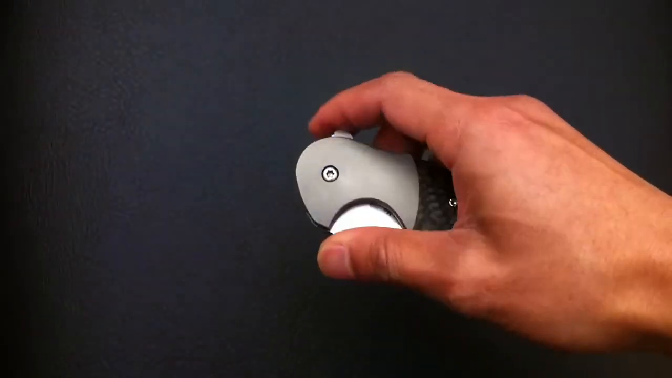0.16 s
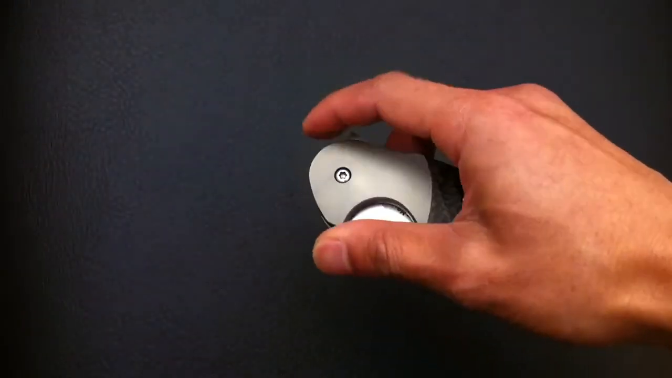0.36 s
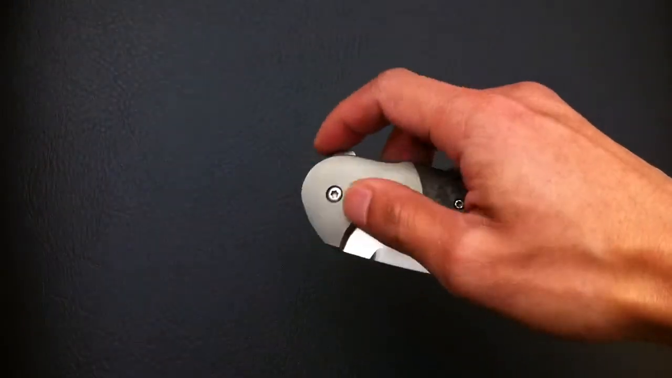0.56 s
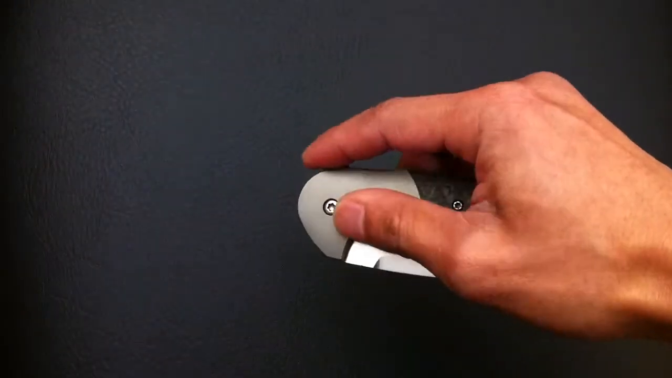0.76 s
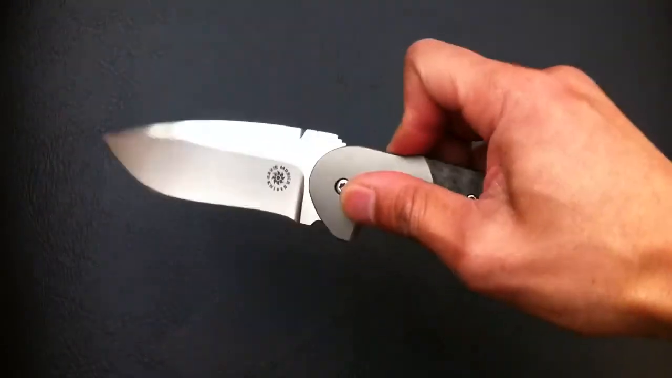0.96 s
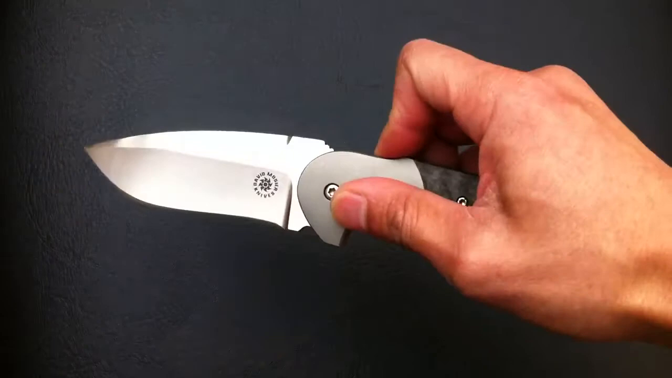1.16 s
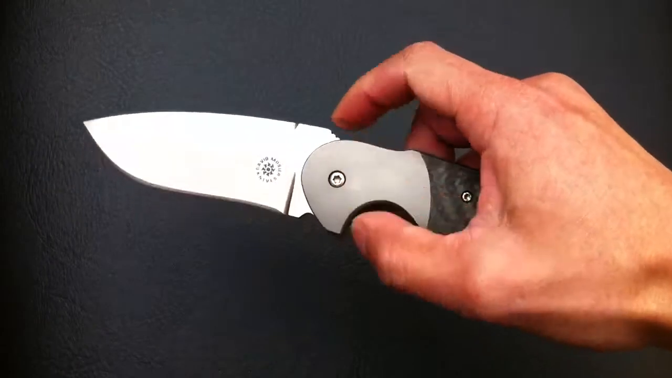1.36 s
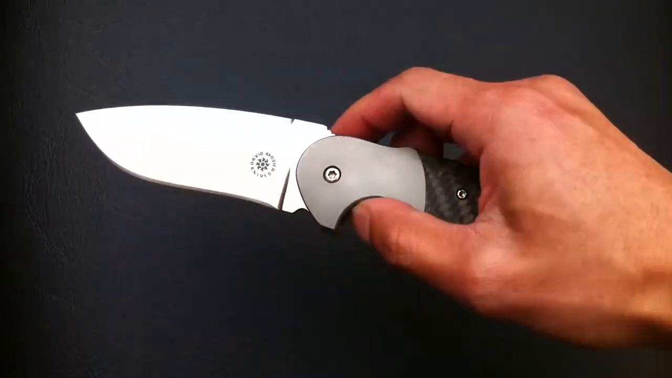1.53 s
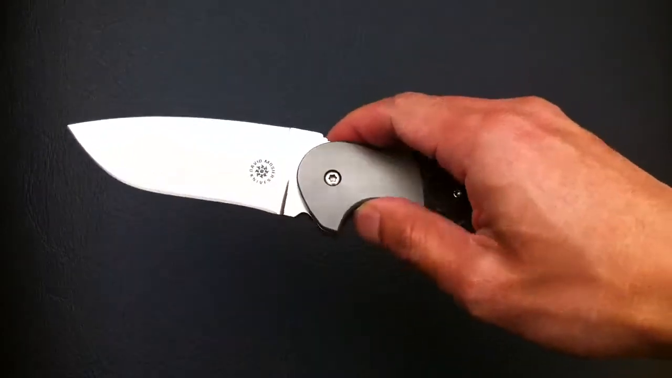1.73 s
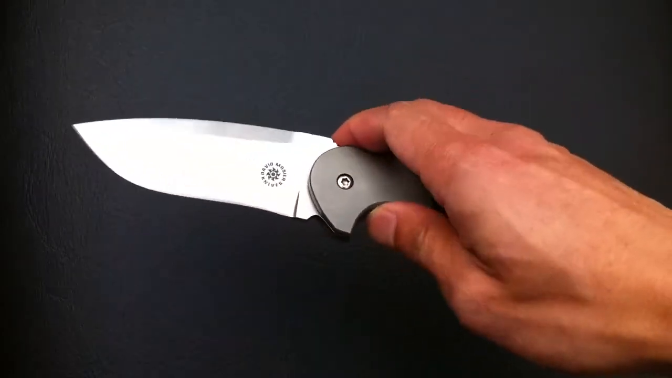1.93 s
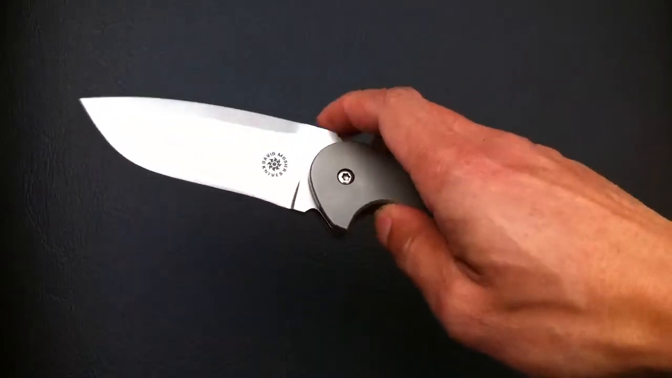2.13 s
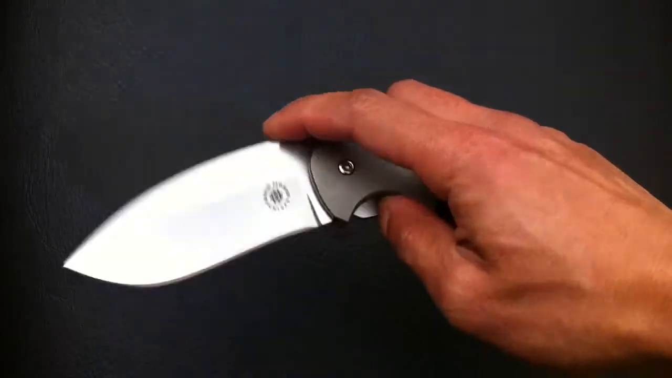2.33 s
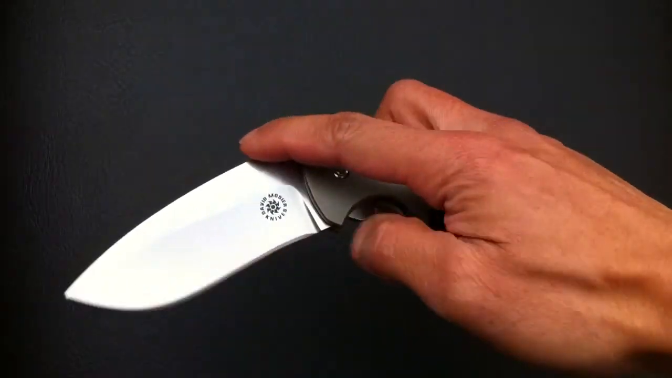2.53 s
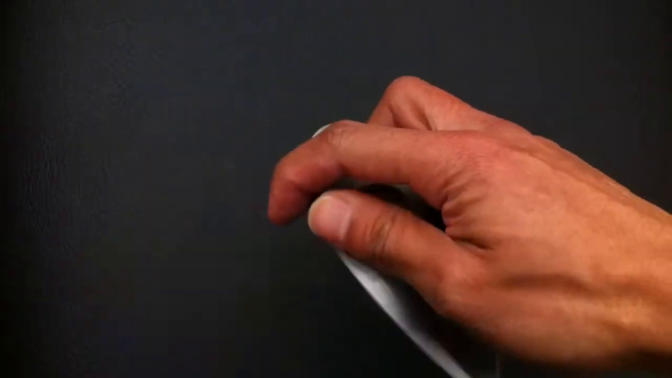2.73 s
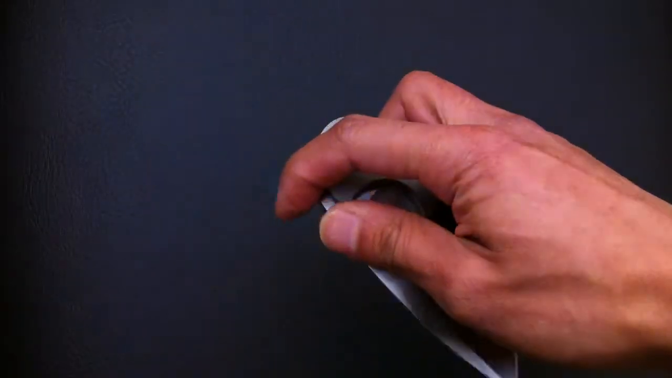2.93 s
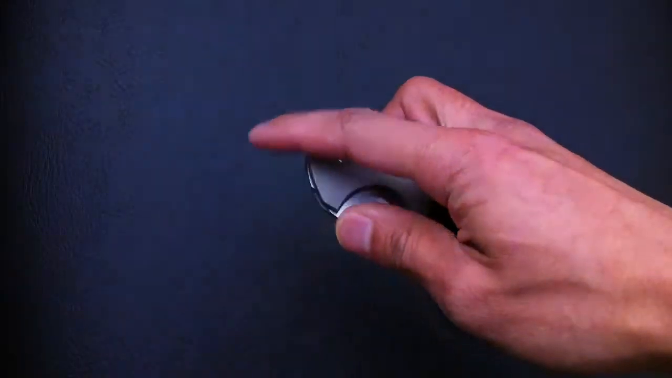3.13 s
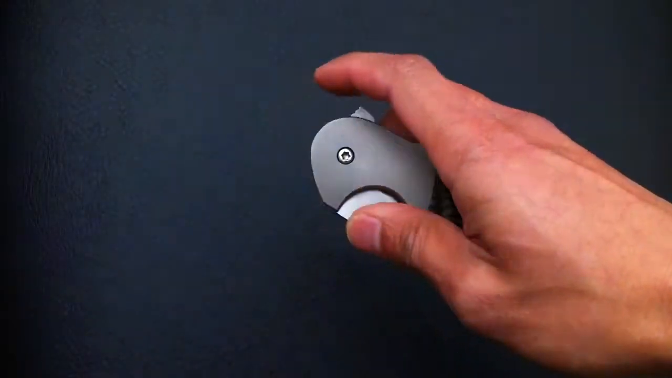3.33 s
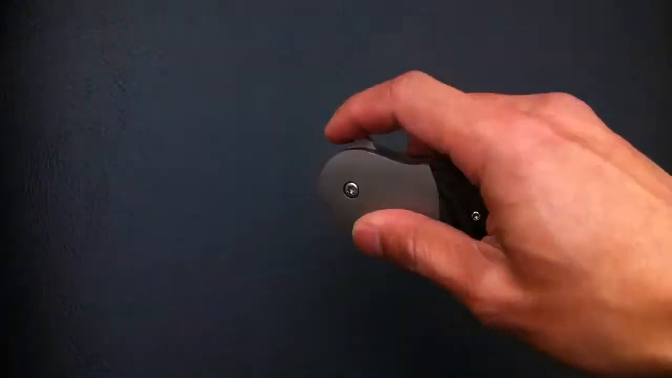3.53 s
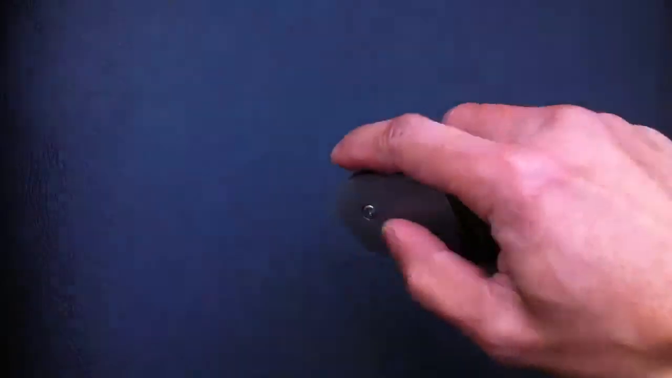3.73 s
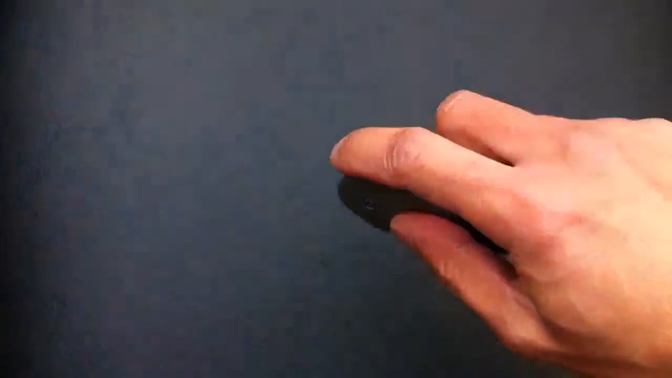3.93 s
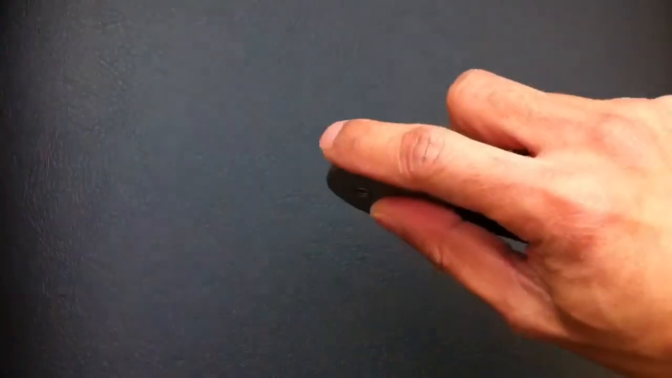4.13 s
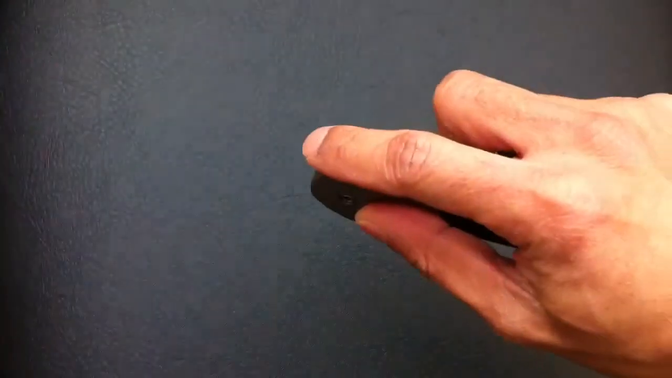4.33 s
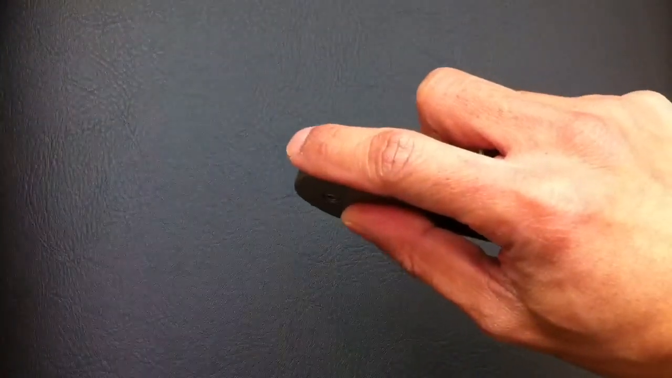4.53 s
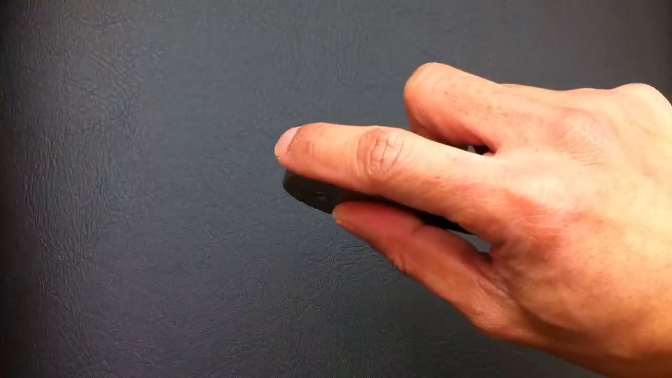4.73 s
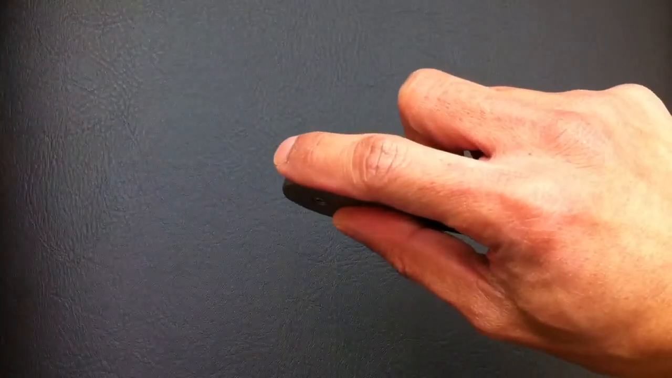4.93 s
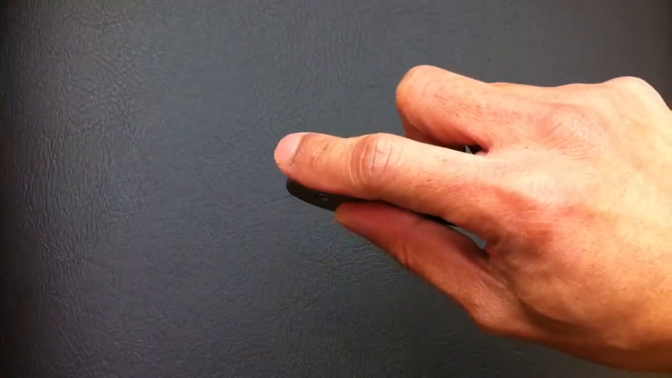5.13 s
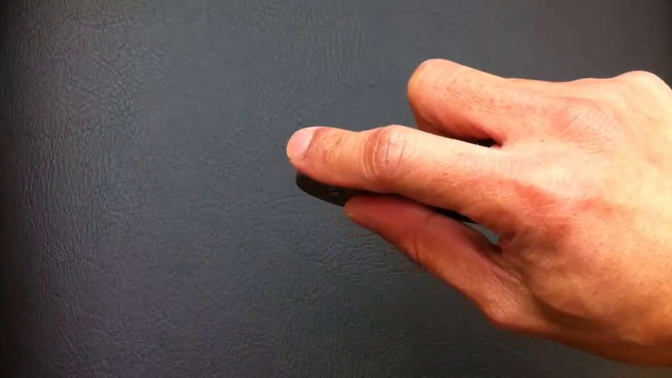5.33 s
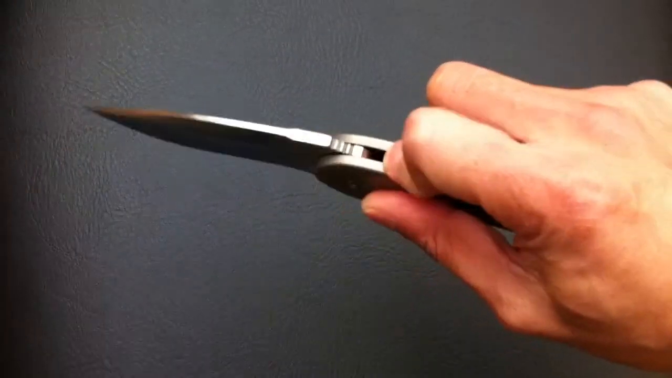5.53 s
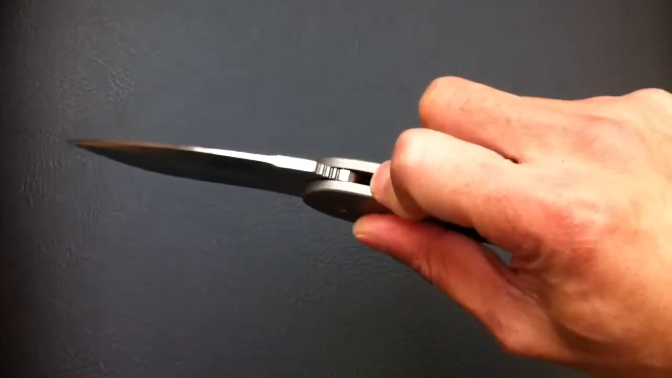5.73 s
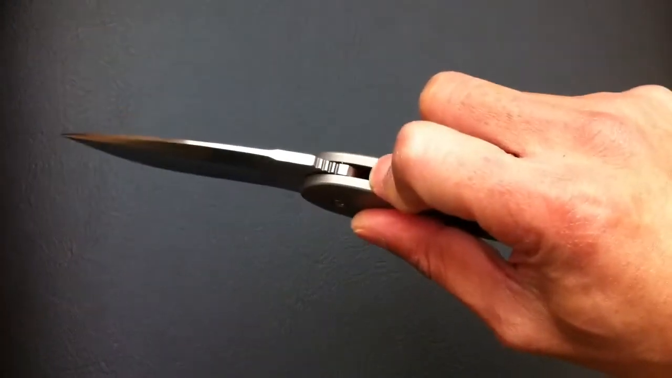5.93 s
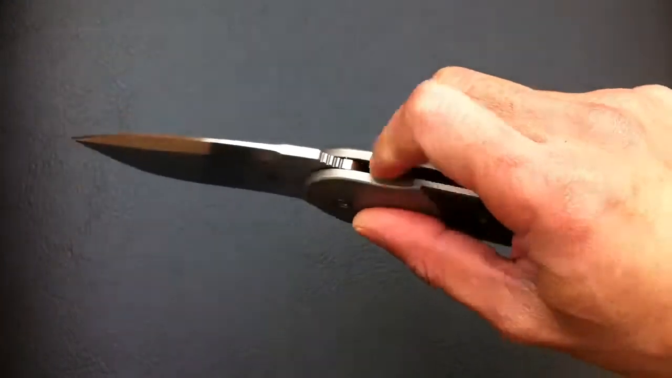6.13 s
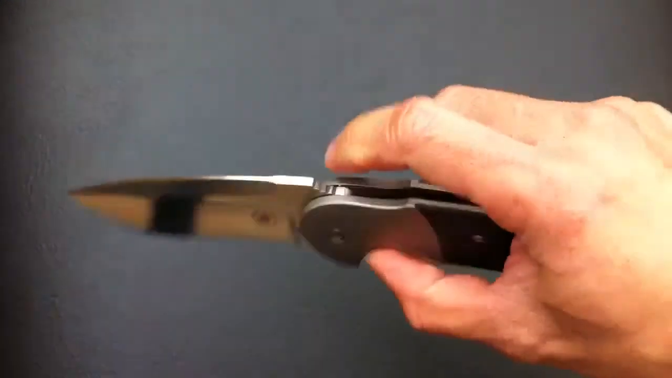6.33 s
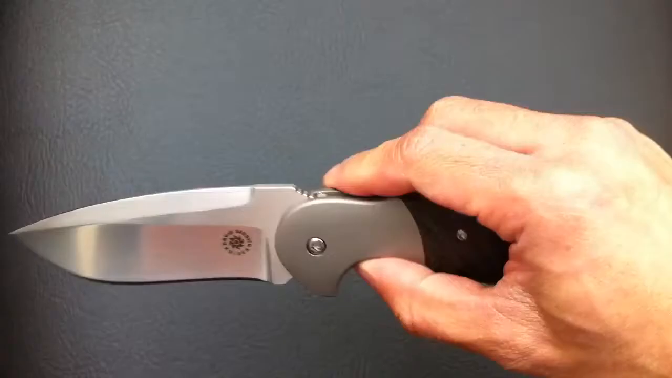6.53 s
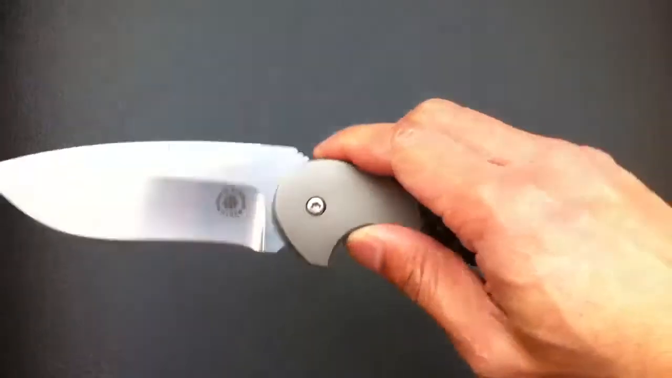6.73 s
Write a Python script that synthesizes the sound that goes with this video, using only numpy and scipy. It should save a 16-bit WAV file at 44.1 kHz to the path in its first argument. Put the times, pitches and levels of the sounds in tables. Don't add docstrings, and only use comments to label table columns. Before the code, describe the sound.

Close up in a quiet room, a folding knife flicks open with a brief swish and a loud, bright steel snap. Faint skin rubbing follows, then a modest click and dull knock as it is folded. Soft low bumps and a run of tiny nail ticks lead to a second hard snap. A small microphone picks up faint room air and distant hum.

```python
import sys
import numpy as np
from scipy import signal
from scipy.fft import rfft, irfft
from scipy.io import wavfile

SR = 44100
rng = np.random.default_rng(int(sys.argv[2]) if len(sys.argv) > 2 else 0)


def persist_wave(psi):
    counts = np.round(np.clip(psi, -1, 1) * 32767).astype(np.int16)
    wavfile.write(sys.argv[1], SR, np.atleast_2d(counts).T)


def volts(x):
    e = np.asarray(x, float) / 20
    return 10 ** e


N = 299439
TIME = np.arange(N) / SR

# start in seconds, peak in dB, level of the lows in dB, strongest frequency in Hz.
CONTACTS = [(0.053, -31, -18, 3700), (0.0536, -24.5, -17, 6670), (0.056, -27, -24, 5000),
            (1.0024, -40, -22, 5620), (1.0053, -34.5, -16, 5510), (1.0642, -16, -26, 6500),
            (1.0654, -13.5, -24.5, 6800), (1.0673, -21.5, -23, 6870), (1.0719, -6, -10, 6930),
            (1.0732, -1, -16, 6160), (1.0755, -13.5, -23, 6000), (1.0815, -24, -11.5, 6160),
            (2.4716, -42, -2.5, 5900), (2.592, -51, -3.5, 5370), (3.3153, -41, 2, 5060),
            (3.318, -25.5, -17, 7000), (3.3199, -29.5, -22, 6870), (5.5979, -35, 1.5, 5500),
            (5.652, -19.5, -27.5, 5100), (5.6531, -18.5, -28.5, 5040), (5.657, -26, -5.5, 6370),
            (5.659, -5.5, -11, 5180), (5.6599, -6, -7.5, 3300), (5.661, -0.5, -11, 6070),
            (5.6621, -3, -11.5, 7070), (5.6628, -18, -6, 6550), (5.6655, -18, -6.5, 3300)]
# start in seconds, peak in dB, level of the lows in dB, strongest frequency in Hz.
TICKS = [(2.49, -52, -12.5, 6460), (3.985, -56, 2, 6370), (4.4069, -36.5, -11, 7300),
         (4.5252, -45.5, -14, 7360), (4.862, -43, 3.5, 5570), (4.8681, -30, -13, 7330),
         (4.896, -34, -13, 7350), (4.9332, -33, -16, 7000), (4.9628, -34, -17, 7400),
         (4.9966, -36.5, -16, 7300), (5.0233, -41, -18, 7300)]
# time in seconds, level in dB.
SWAY = [(0, -54.5), (.43, -60.5), (.74, -43), (1.0, -59), (2.3, -60.5), (2.9, -53.5), (3.25, -59.5),
        (3.48, -42), (3.69, -47.5), (3.9, -44.5), (4.25, -58.5), (5.5, -60), (6.79, -55.5)]


def rms_one(x):
    return x / np.sqrt(np.mean(x ** 2) + 1e-30)


def band(x, low_hz, high_hz):
    sos = signal.butter(2, [low_hz, min(high_hz, 0.45 * SR)], "band", fs=SR, output="sos")
    return signal.sosfilt(sos, x)


def ring(x, hz, width_hz):
    radius, turn = np.exp(-np.pi * width_hz / SR), 2 * np.pi * hz / SR
    return signal.lfilter([0, np.sin(turn)], [1, -2 * radius * np.cos(turn), radius ** 2], x + 1e-18)


def drift(rate):
    steps = rng.standard_normal(int(N / SR * 40) + 2)
    return rms_one(np.interp(TIME * min(rate, 39), np.arange(len(steps)), steps))


def strikes(events, modes, scatter_db, widen, focus_db, highs_db):
    out, time = np.zeros(N + 2048), np.arange(1920) / SR
    log_hz = np.log(np.arange(1025) * SR / 2048 + 1)
    for s, peak_db, lows_db, strongest_hz in events:
        struck = list(modes) + [(strongest_hz, 330, focus_db)]
        hz, width_hz, level_db = np.transpose(struck)[:, :, None]
        strength = volts(level_db + scatter_db * rng.standard_normal(hz.shape))
        strength = strength * np.sign(rng.standard_normal(hz.shape))
        ringing = np.sin(2 * np.pi * hz * time) * np.exp(-np.pi * widen * width_hz * time)
        sound = np.sum(strength * ringing, axis=0)
        sound[:200] += volts(-0.5) * rng.standard_normal(200) * np.exp(-time[:200] / 0.00055)
        sound *= 1 - np.exp(-time / 0.0004)

        thud_db = -24.5 - 0.4 * peak_db
        bright_db = highs_db + 0.15 * peak_db
        tilt_hz = [130, 400, 1000, 2700, 4100, 5200, 11000, 16000]
        tilt_db = [thud_db - 34, thud_db + 6, thud_db + 19, lows_db + 13.5,
                   0.5 * lows_db - 2, 0, bright_db + 8, bright_db - 3.5]
        tilt = volts(np.interp(log_hz, np.log(tilt_hz), tilt_db))
        sound = irfft(rfft(np.pad(sound, 64)) * tilt)
        at = round(s * SR) - 64
        out[at:at + 2048] += volts(peak_db) * sound / np.abs(sound).max()
    return out[:N]


def steel():
    # frequency in Hz, width in Hz, level in dB.
    knife = [(600, 400, -18.5), (950, 400, -11.5), (1900, 680, -10.5), (2500, 270, -11), (3335, 170, -11),
             (4700, 250, -10.5), (5340, 270, -6.5), (6200, 300, -6), (6760, 320, -0.5), (7830, 180, -10),
             (9030, 210, -10.5), (10900, 350, -9), (12320, 400, -7), (13900, 300, -12.5)]
    return strikes(CONTACTS, knife, scatter_db=2.5, widen=1.3, focus_db=7.5, highs_db=-6)


def nail_ticks():
    # frequency in Hz, width in Hz, level in dB.
    ridges = [(3360, 410, -8), (5770, 480, -7), (7350, 280, -6), (9330, 210, -11.5), (11000, 1100, -5.5),
              (13500, 700, -16.5)]
    return strikes(TICKS, ridges, scatter_db=3.5, widen=1.03, focus_db=1.0, highs_db=-1)


def room():
    # band centre in Hz, width in Hz, level in dB, 60 dB decay time in seconds.
    tail = [(1400, 700, -17.5, 0.11), (2550, 900, -10, 0.19), (3300, 600, -6, 0.15), (4820, 1300, -4, 0.17),
            (6080, 1100, 2, 0.19), (5900, 540, -10, 0.26), (6630, 2000, -7, 0.23), (9140, 2300, -6, 0.2),
            (12100, 3000, -11, 0.13)]
    time, energy, out = np.arange(SR // 2) / SR, np.zeros(N), 0
    s, peak_db = np.transpose(CONTACTS + TICKS)[:2]
    energy[(s * SR).astype(int)] = volts(2.75 * peak_db + 2)
    build_up = np.clip((time - 0.001) / 0.005, 0, 1)
    for hz, width_hz, level_db, t60 in tail:
        decay = (build_up * volts(level_db - 32 - 60 * time / t60)) ** 2
        envelope = np.sqrt(np.abs(signal.fftconvolve(energy, decay)[:N]))
        noise = band(rng.standard_normal(N), hz - width_hz / 2, hz + width_hz / 2)
        out = out + envelope * rms_one(noise) * volts(3.5 * drift(39))
    return out


def strokes():
    # peak time in seconds, peak in dB, length in seconds,
    # brightness in dB, hump frequency in Hz.
    rubs = [(.14, -75, .1, 15, 6300), (.24, -73, .3, -4, 6255), (.38, -57.5, .05, -6, 5590),
            (.42, -67, .2, -5, 5900), (.74, -70, .2, -6, 6120), (0.841, -70, .3, -7, 6200),
            (1.42, -71, .16, -10, 6300), (1.572, -70.5, .06, -16.5, 6030), (1.635, -71, .2, -6, 6202),
            (1.79, -70, .06, -16, 5990), (1.95, -75.5, .7, -8, 6130), (2.474, -65, .05, -7, 5770),
            (2.605, -65, .08, -6, 5900), (2.816, -71, .3, -3, 6370), (3.565, -60, .17, -13, 5810),
            (3.656, -62.5, .22, -8.5, 5890), (3.878, -66.5, .15, -10, 5870), (3.98, -67.5, .06, 5, 5960),
            (4.087, -66.5, .2, -4.5, 6490), (4.435, -63, .1, -1.5, 6940), (5.385, -63.5, .18, -8.5, 6190),
            (6.435, -63, .13, -9, 6440), (6.613, -68.5, .22, -5, 6380), (6.726, -65.5, .12, -11, 6480)]
    # start in seconds, stop in seconds, level in dB, hump in Hz.
    swings = [
        (1.008, 1.049, -57, 5686),
        (5.602, 5.64, -56, 6100),
    ]
    rise_share = 0.41
    time = TIME[::32]
    body = volts(-88) + 0 * time
    skin, pull = body * volts(-2.5), body * 6100
    for s, peak_db, length, bright_db, hz in rubs:
        away = np.maximum((s - time) / (rise_share * length), (time - s) / ((1 - rise_share) * length))
        level = volts(peak_db - 24.5 * away ** 1.4)
        body, skin, pull = body + level, skin + level * volts(bright_db), pull + level * hz
    for start, stop, peak_db, hz in swings:
        fade = np.clip(np.minimum(time - start, stop - time) / 0.0045, 0, 1)
        arch = np.clip(2 * (time - start) / (stop - start) - 1, -1, 1) ** 2
        level = fade * volts(peak_db - 8.5 * arch)
        body, skin, pull = body + level, skin + level * volts(-5), pull + level * hz
    return [np.interp(TIME, time, curve) for curve in (body, skin, pull / body)]


def rubbing():
    body, skin, centre_hz = strokes()
    grains = rng.standard_normal((3, N)) * volts(3.5 * np.minimum(rng.exponential(1, (3, N)), 5))

    slow = band(grains[:2], 12, 480)
    turn = 2 * np.pi * np.cumsum(centre_hz) / SR
    hump = rms_one(slow[0] * np.cos(turn) + slow[1] * np.sin(turn))
    hump = hump + volts(-5) * rms_one(band(grains[0], 2900, 8500))

    sheen = rms_one(ring(grains[2], 9500, 980) - ring(grains[2], 10900, 800))
    sheen = sheen + volts(-1.0) * rms_one(band(grains[2], 7500, 11800))

    body = body * volts(2 * drift(35))
    skin = skin * volts(2 * drift(25) - 1.0)
    return body * rms_one(hump) + skin * rms_one(sheen)


def tremors():
    count = 32
    when = rng.random(count) * N / SR
    size, pitch, span = rng.standard_normal((3, count))
    peak_db, hz, length_ms = -48 + 2 * size, 240 * np.exp(0.15 * pitch), 7.3 * np.exp(0.33 * span)
    return np.transpose([when, peak_db, hz, length_ms]).tolist()


def bumps():
    # time in seconds, peak in dB, frequency in Hz, length in milliseconds.
    clear_bumps = [(.0187, -40, 263, 4.7), (.6436, -44.5, 160, 19), (0.6673, -35.5, 184, 8.4),
                   (0.6819, -38, 238, 6.6), (0.6933, -33.5, 207, 6.3), (0.7006, -31, 242, 3.4),
                   (.7436, -39.5, 190, 4.9), (1.321, -46.5, 242.4, 5), (1.358, -39.5, 149, 10),
                   (1.7837, -39, 193, 4.6), (1.905, -47, 574, 19), (1.9747, -40.5, 346, 4.3),
                   (2.5338, -45, 240, 5.2), (3.3191, -39, 212, 5.9), (3.331, -30.5, 222, 3.2),
                   (3.34, -33.5, 175, 3.9), (3.3557, -25, 192, 7.1), (3.494, -34.5, 200, 3.2),
                   (3.505, -29.5, 181, 8), (3.517, -36.5, 206, 7.8), (3.5271, -36.5, 204, 6.7),
                   (3.5809, -34, 190, 6.7), (3.674, -38.5, 158, 5), (3.737, -42, 184, 7.9),
                   (3.7526, -36.5, 190, 6.8), (3.816, -37, 162, 7), (3.837, -40, 151, 18),
                   (4.171, -44.5, 200, 4.3), (4.4124, -42, 318, 4.6), (5.495, -42.5, 254, 6)]
    out = np.zeros(N)
    for s, peak_db, hz, length_ms in clear_bumps + tremors():
        near = slice(max(round((s - 0.1) * SR), 0), round((s + 0.1) * SR))
        away = TIME[near] - s
        swell = np.exp(-0.5 * (away / (0.00044 * length_ms)) ** 2)
        turn = 2 * np.pi * (hz * away + rng.random())
        swing = swell * np.cos(turn) + 0.2 * swell ** 2 * np.cos(2 * turn)
        out[near] += volts(peak_db + 2) * swing
    rumble = rms_one(band(band(rng.standard_normal(N), 86, 210), 82, 290))
    rumble_db = np.interp(TIME, *np.transpose(SWAY)) - 9 + 2.8 * drift(25)
    return out + rumble * volts(rumble_db)


def air():
    # frequency in Hz, level in dB per Hz.
    colour = [(40, -46.5), (90, -24.5), (140, -5), (270, -3.5), (330, -6.5), (600, -10), (950, -8),
              (1450, -15.5), (2100, -24.5), (3000, -32), (4300, -34), (6300, -33.5), (8500, -37),
              (16000, -39.5)]
    # time in seconds, level in dB.
    traffic = [(0, 0.9), (1.2, -1), (2, 0), (3, 0), (4, 1.26), (5, 0.77), (5.8, 2), (6.8, 1.5)]
    hz = np.arange(N // 2 + 1) * SR / N + 1
    points_hz, points_db = np.transpose(colour)
    shape = volts(np.interp(np.log(hz), np.log(points_hz), points_db))
    level_db = -53.5 + np.interp(TIME, *np.transpose(traffic)) + 0.299 * drift(6.7)
    return volts(level_db) * rms_one(irfft(rfft(rng.standard_normal(N)) * shape, N))


def machinery():
    # frequency in Hz, wander in Hz, level in dB.
    hums = [(138, 4, -1), (269, 4, 1.5)]
    # time in seconds, level in dB.
    load = [(0, -69.5), (.85, -62.5), (1.1, -70), (2.1, -70.5), (2.4, -60.5), (2.75, -60), (2.95, -59),
            (3.35, -58), (3.7, -63), (3.9, -69.5), (4.3, -61), (4.9, -67), (5.4, -61.5), (5.8, -70),
            (6.1, -62), (6.79, -65)]
    sway_db = np.interp(TIME, *np.transpose(SWAY))
    load_db = np.interp(TIME, *np.transpose(load))
    swells_db = np.maximum(load_db, sway_db - 12), load_db
    out = np.zeros(N)
    for (hz, wander_hz, level_db), swell_db in zip(hums, swells_db):
        tone = np.sin(2 * np.pi * np.cumsum(hz + wander_hz * drift(4)) / SR)
        out += volts(level_db + swell_db) * rms_one(tone) * volts(2.5 * drift(8))
    return out


def scene():
    return (steel() + nail_ticks() + room() + rubbing() + bumps() + air() + machinery())[None]


def low_pass(x):
    return signal.sosfilt(signal.butter(12, 16530, fs=SR, output="sos"), x)


def record(dry):
    duck_from_db, duck_share, recover_s, attack_s = -13.5, 0.48, 0.92, 0.022
    heard = signal.sosfilt(signal.butter(3, 72, "high", fs=SR, output="sos"), dry[0])

    ramp = TIME / recover_s
    over_db = duck_share * np.maximum(20 * np.log10(np.abs(heard) + 1e-9) - duck_from_db, 1e-3)
    held_db = np.exp(np.maximum.accumulate(np.log(over_db) + ramp) - ramp)
    pole = np.exp(-1 / (attack_s * SR))
    ducked = heard * volts(-signal.lfilter([1 - pole], [1, -pole], held_db))

    flicker = rms_one(band(rng.standard_normal(N), 12, 70))
    ducked = ducked + volts(-91) * flicker
    rounded = 0.75 * np.tanh(ducked / 0.75)
    rounded = signal.sosfilt(signal.cheby2(12, 60, 16500, fs=SR, output="sos"), rounded)
    return low_pass(rounded)


dry = scene()
out = record(dry)
persist_wave(out)
```